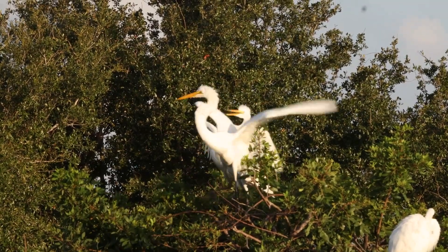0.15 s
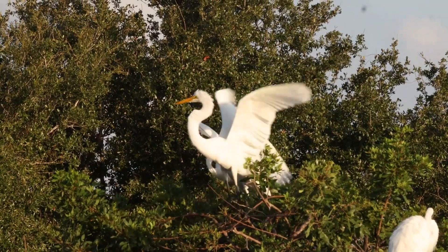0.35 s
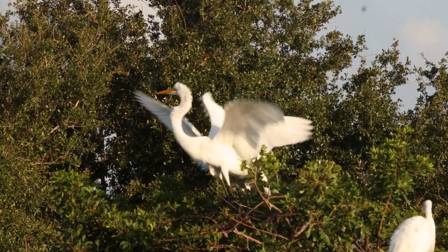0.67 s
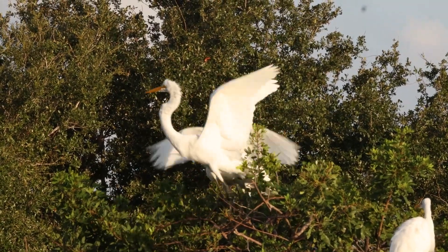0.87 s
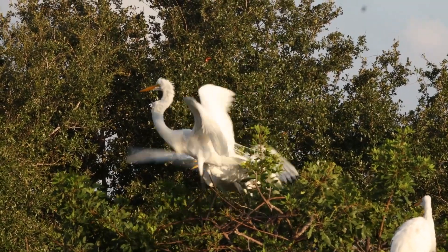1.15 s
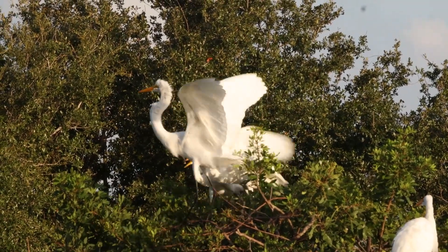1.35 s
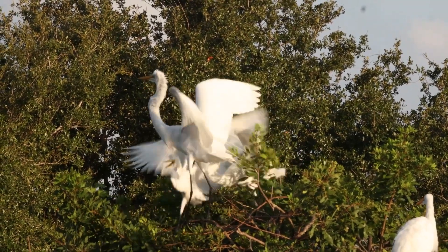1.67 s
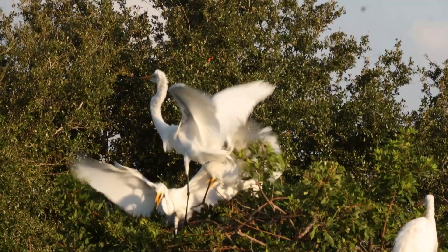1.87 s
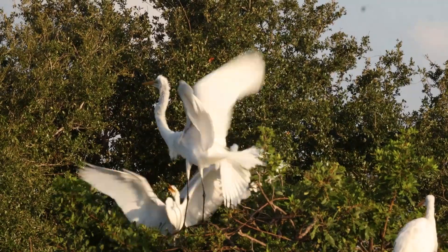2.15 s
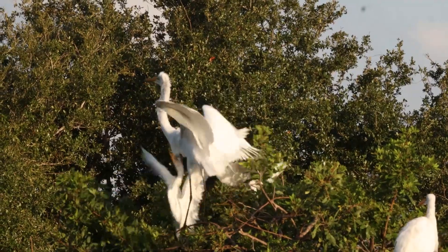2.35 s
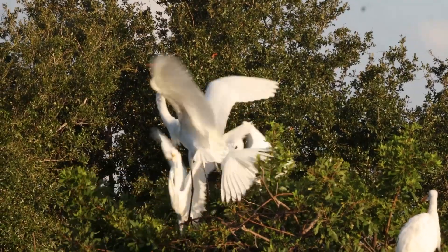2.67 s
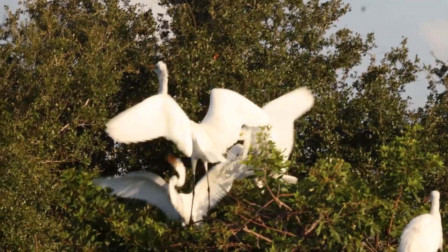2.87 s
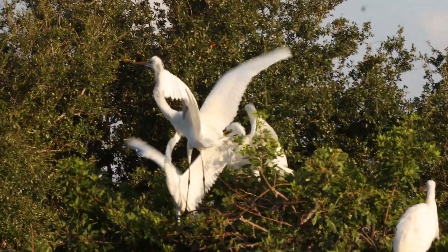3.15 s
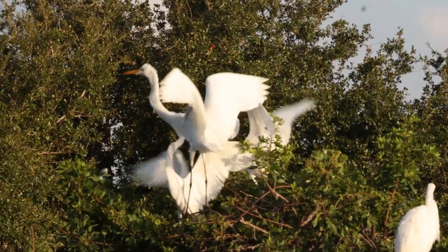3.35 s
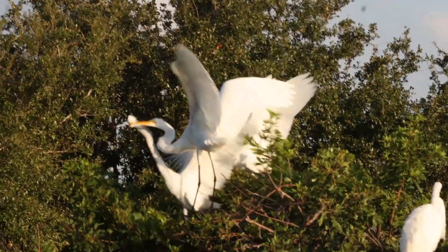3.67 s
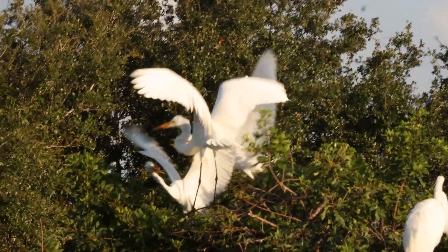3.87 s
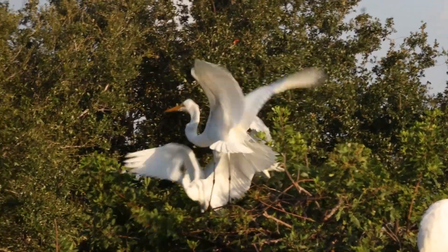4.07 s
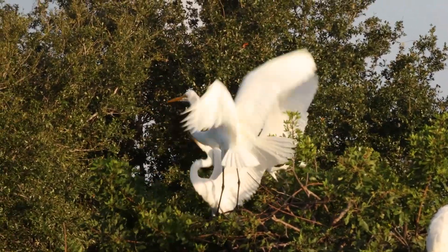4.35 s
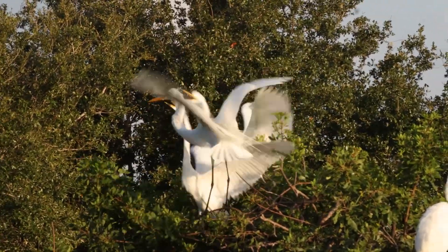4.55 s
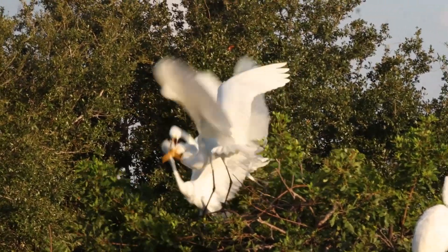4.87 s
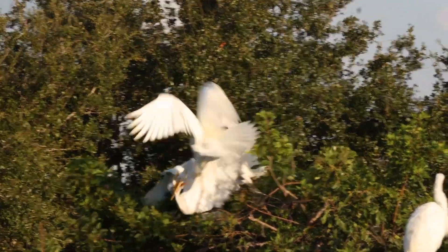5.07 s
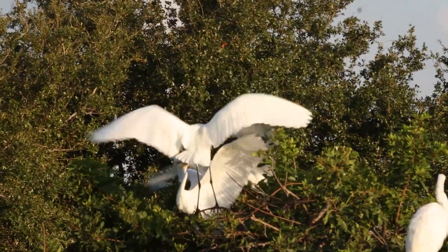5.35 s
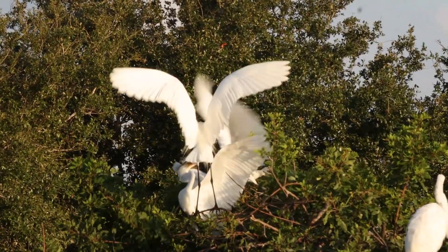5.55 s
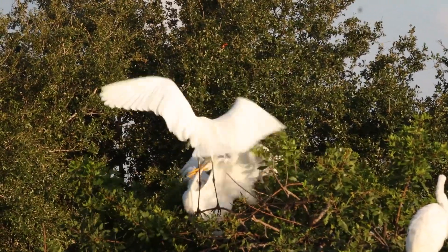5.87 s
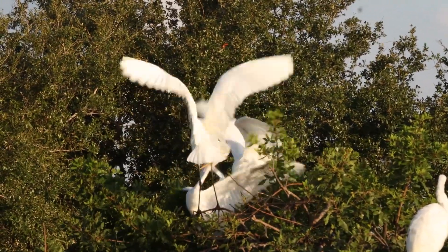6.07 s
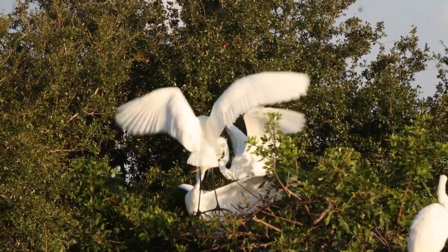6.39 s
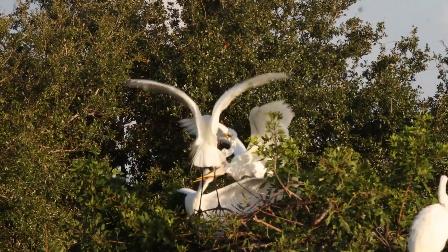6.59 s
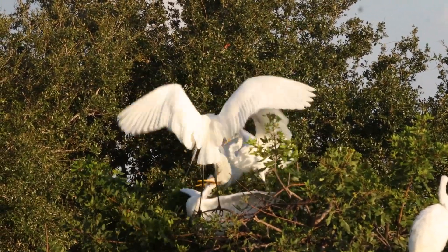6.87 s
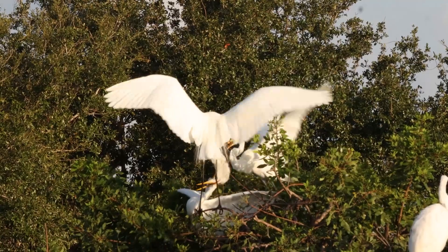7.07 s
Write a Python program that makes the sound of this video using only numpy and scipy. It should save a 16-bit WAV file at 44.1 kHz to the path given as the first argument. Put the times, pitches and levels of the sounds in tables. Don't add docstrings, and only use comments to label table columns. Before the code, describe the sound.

Heron chicks beg in rapid, hoarse, rattling squawks near the microphone, with small-bird whistles, distant nest chatter and a faint road rush behind.

```python
import sys
import numpy as np
from scipy import signal
from scipy.fft import rfft, irfft, next_fast_len
from scipy.io import wavfile
from scipy.ndimage import uniform_filter1d, map_coordinates

SR = 44100
rng = np.random.default_rng(int(sys.argv[2]) if len(sys.argv) > 2 else 0)


def store_pcm(level_fs):
    pcm = np.round(np.clip(level_fs, -1, 1) * 32767).astype(np.int16)
    wavfile.write(sys.argv[1], SR, np.atleast_2d(pcm).T)


def ratio(d):
    e = np.asarray(d, float) / 20
    return 10 ** e


N = 318402


def unit(x):
    return x / np.sqrt(np.mean(x ** 2) + 1e-20)


def along(points, hz):
    f, v = np.transpose(points)
    return np.interp(np.log(hz + 1), np.log(f + 1), v)


def curves(rows):
    s, *cols = np.transpose(rows)
    return [np.interp(np.arange(N) / SR, s, c) for c in cols]


def wobble(rate, size):
    knots = rng.standard_normal(int(size * rate / SR) + 4)
    return map_coordinates(knots, [np.arange(size) * rate / SR])


def phase(hz):
    return 2 * np.pi * np.cumsum(hz) / SR


def filtered(x, response):
    m = next_fast_len(len(x) + 2048)
    return irfft(rfft(x, m) * response(np.fft.rfftfreq(m, 1 / SR)), m)[:len(x)]


def resonance(f, hz, width_hz):
    return 1j * f * width_hz / (hz * hz - f * f + 1j * f * width_hz)


def add(track, s, sound):
    part = track[max(round(s * SR), 0):][:len(sound)]
    part += sound[:len(part)]


# (frequency [Hz], level [dB])
ROAD_COLOUR = [(13, -51), (22, -26.5), (84, -1), (146, 0.5), (291, -7.5), (760, 4), (1550, 0),
               (1780, -12.5), (2410, -22), (3260, -42), (3640, -10), (6130, -39), (7030, -29), (12200, -39),
               (15600, -46)]
# (time [s], level [dB])
ENGINE_LOAD = [
    (0, -60),
    (1, -54.5),
    (1.7, -60),
    (2.9, -54),
    (4.2, -56.5),
    (4.7, -49),
    (5.7, -53),
    (6.3, -50.5),
    (7.22, -50.5),
]
# (multiple of the main order [ratio], level [dB])
ENGINE_ORDERS = [(.5, -15), (1, 0), (1.5, -6.5), (2, -9)]


def road():
    rush = unit(filtered(rng.standard_normal(N), lambda f: ratio(along(ROAD_COLOUR, f))))
    idle_hz, hunt_hz = 163.8, 1.493
    turn = phase(idle_hz + hunt_hz * wobble(3, N))
    load_db = curves(ENGINE_LOAD)[0]
    hum = np.zeros(N)
    for multiple, db in ENGINE_ORDERS:
        level = ratio(db + 2.9 * wobble(2.99, N))
        hum += level * np.sin(multiple * turn + 0.63 * wobble(4.44, N))
    drift = ratio(.4 * wobble(1.5, N))
    return ratio(-40) * drift * rush + ratio(load_db + 0.5) * hum


# (time [s], level [dB])
NEST_LEVEL = [(0, -30.5), (.2, -35), (.62, -37), (1.3, -36.5), (2.4, -35), (3.86, -40.5), (4.42, -37.5),
              (5.67, -42.5), (6.1, -38.5), (6.8, -40), (7.22, -33)]
# (frequency [Hz], level [dB])
NEST_COLOUR = [(1000, -30), (1600, 1), (2400, 6.5), (3300, -1.5), (4500, -10.5), (6200, -11.5), (7500, -26),
               (11000, -36.5), (16000, -47)]


def nests():
    z = signal.stft(rng.standard_normal(N), nperseg=512)[2]
    patches = uniform_filter1d(rng.standard_normal(z.shape), 6, 0)
    patches = uniform_filter1d(patches, 10, 1)
    blur = signal.istft(z * ratio(2.5 * unit(patches)), nperseg=512)[1][:N]
    hoarse = ratio(1.2 * wobble(200, N) + 1.2 * wobble(9, N))
    band = unit(filtered(blur * hoarse, lambda f: ratio(along(NEST_COLOUR, f))))
    return ratio(curves(NEST_LEVEL)[0] - 5.5) * band


# (frequency [Hz], time to fall 60 dB [s])
TREE_DECAY = [(500, 0.057), (2500, 0.18), (9000, 0.18)]


def trees(x):
    hz, t, z = signal.stft(rng.standard_normal(SR // 2), SR, nperseg=256)
    decay = ratio(-60 * t / along(TREE_DECAY, hz)[:, None])
    tail = signal.istft(z * decay, SR, nperseg=256)[1]
    late = np.pad(x, (200, 0))
    return signal.fftconvolve(late, tail / np.linalg.norm(tail))[:N]


# (time [s], length [s], start [Hz], end [Hz], level [dB])
WHISTLES = [(0, .05, 3130, 3120, -33.2), (0, .02, 2400, 2300, -44.7), (.05, .03, 2250, 2250, -40.7),
            (.05, .018, 5500, 5600, -42.9), (.1, .11, 3100, 2380, -36.2), (.13, .2, 6750, 7000, -63.7),
            (.57, .07, 1900, 1900, -43.9), (1.045, .04, 3050, 3230, -39.5), (1.08, .07, 3230, 2780, -36.5),
            (1.79, .09, 2450, 2450, -40.6), (2.06, .05, 3100, 2800, -34.3), (2.2, .05, 3300, 2800, -35.7),
            (2.235, .1, 2500, 1950, -38.8), (2.555, .035, 2900, 2400, -43), (2.88, .13, 6800, 6850, -60.4),
            (3.8, .1, 2300, 2350, -43.3), (4.11, .11, 3000, 2200, -46), (5.305, .025, 3100, 2500, -44),
            (5.34, .025, 3000, 2400, -45.1), (5.52, .04, 2900, 2300, -40.4), (6.36, .07, 2900, 2100, -43.7),
            (5.9, .12, 3400, 2800, -45), (6.9, .11, 3500, 2900, -47), (7.05, .11, 3300, 2800, -50)]
# (time [s], length [s], start [Hz], end [Hz], level [dB])
TRILLS = [
    (.07, .47, 5750, 5750, -51.2),
    (.07, .35, 3150, 3150, -51.4),
    (2.73, .06, 3100, 2900, -43.8),
    (3.63, .08, 3400, 3000, -39.1),
    (4.88, .18, 3620, 3600, -50.2),
    (5.36, .065, 2850, 2700, -42.4),
]


def songbirds():
    x = np.zeros(N)
    trill_per_s = 58
    songs = [(*w, 0) for w in WHISTLES] + [(*w, trill_per_s) for w in TRILLS]
    for s, length, from_hz, to_hz, db, rate in songs:
        u = np.linspace(0, 1, round(length * SR))
        glide_hz = from_hz + (to_hz - from_hz) * np.sin(np.pi * u / 2) ** 2
        shake_hz = .012 * from_hz + min(700 * length, 70)
        hz = glide_hz + shake_hz * wobble(500, len(u))
        chop = (.5 + .5 * np.cos(2 * np.pi * rate * length * u)) ** 3
        swell = np.sin(np.pi * u) ** .2 * ratio(1.5 * wobble(250, len(u)))
        add(x, s, ratio(db + 2.5) * unit(swell * chop) * np.sin(phase(hz)))
    return x


# (time [s], peak level [dB])
CLACKS = [
    (2.7594, -58),
    (5.0564, -46),
    (5.1971, -38),
    (5.7853, -29),
]


def clacks():
    x, t = np.zeros(N), np.arange(800) / SR
    for s, db in CLACKS:
        decay = ratio(db - 6.5 - 60 * t / .012)
        add(x, s, decay * rng.standard_normal(len(t)))
    return filtered(x, lambda f: resonance(f, 2800, 8000))


# (centre [Hz], width [Hz], level [dB])
WINDPIPE = [(2120, 600, -8.5), (2780, 880, -18.5), (4630, 1900, -13)]
# (frequency [Hz], level [dB])
BILL = [(2500, -128), (4500, 1), (6000, 5.5), (8000, -4.5), (11000, -13.5), (14000, -21.5), (16000, -27)]


def squawk(length, peak, db, pitch_hz, rattle_hz, chest_db, throat_hz, mouth_hz, mouth_db, bright_db, depth):
    size = SR // 5
    u = np.arange(size) / SR / length
    peak = np.clip(peak, .1, .85)
    rise_db = 6.68 * (1 - u / peak) ** 2
    fall_db = 13.84 * np.abs((u - peak) / (1.05 - peak)) ** 2.13
    onset = np.clip(u * length / .004, 0, 1)
    effort = ratio(-np.where(u < peak, rise_db, fall_db)) * onset

    slow = phase(rattle_hz * (1 + .025 * wobble(60, size)))
    gate = 1 + np.clip(.38 + 1.3 * depth, 0, .95) * np.cos(slow + .6 * np.sin(slow))
    bend = .07 * (effort - .85) + .02 * wobble(30, size) + .015 * wobble(300, size)
    turn = phase(pitch_hz * (1 + bend))
    orders = np.arange(2, 31)[:, None]
    uneven = ratio(2.8 * wobble(45, orders.size * size).reshape(-1, size))
    start = 1.5 * rng.standard_normal(orders.shape)
    pulses = (uneven * np.cos(orders * turn + start)).sum(axis=0)
    pulses = unit(pulses) * ratio(1.5 * wobble(500, size))
    breath = rng.standard_normal(size) * (1 + .8 * np.cos(turn))
    source = gate * (pulses + .6 * breath)

    def windpipe(f):
        return sum((-1) ** k * ratio(g) * resonance(f, c, w) for k, (c, w, g) in enumerate(WINDPIPE))

    def tract(gape):
        def response(f):
            low_chest = ratio(chest_db) * resonance(f, 1090, 270)
            chest = ratio(chest_db + 5.5) * resonance(f, 1568, 275) ** 2
            throat = resonance(f, gape ** .9 * throat_hz, 420) ** 2
            mouth = ratio(mouth_db - 1.5) * resonance(f, gape * mouth_hz, 610)
            cut = resonance(f, 2800, 3400) ** 2
            return cut * (throat - mouth - chest + windpipe(f) + low_chest)
        return filtered(source, response)

    opening = 4 * np.sin(np.pi * np.clip(u, 0, 1) ** .7) ** .6
    body = sum(np.clip(1 - abs(opening - k), 0, 1) * tract(.64 + .1 * k) for k in range(5))
    hollows = throat_hz * (np.arange(2, 6) + .3 * rng.standard_normal(4))

    def edge(f):
        return ratio(along(BILL, f)) * (1 + sum(resonance(f, c, 250) for c in hollows))

    top = filtered(np.sqrt(gate) * source, edge)
    top = top * ratio(2 * wobble(90, size))
    bright = effort ** 1.95 * ratio(bright_db + 8.5) * unit(top)
    return ratio(db - 2.5) * (effort * unit(body) + bright)


# (time [s], length [s], peak position [share of length], level [dB], bill brightness [dB])
DEEP = [(.202, 0.089, 0.49, -28.5, -24), (.807, 0.048, 0.38, -26, -17.5), (1.64, 0.064, 0.15, -30, -17.5),
        (1.786, .051, 0.14, -33, -19), (2.177, 0.057, .18, -27, -12), (2.455, 0.069, 0.4, -34, -18),
        (3.685, 0.062, 0.34, -31.5, -18.5), (4.467, 0.063, 0.32, -28, -19),
        (6.244, 0.055, 0.23, -34, -14.5), (6.882, 0.087, 0.22, -37, -17.5),
        (6.999, 0.064, 0.17, -39, -10.5), (7.158, 0.0596, 0.49, -33, -10.5)]
HOARSE = [(.969, 0.048, 0.31, -22, -20), (1.233, 0.062, 0.42, -28.5, -20.5), (1.38, 0.054, 0.3, -23, -20),
          (3.253, 0.041, .36, -29, -21), (3.896, .055, .41, -30.5, -25.5), (4.045, .04, 0.38, -25.5, -18.5),
          (4.624, 0.063, 0.27, -23, -24), (6.3, 0.059, 0.15, -33, -26), (6.516, 0.05, 0.55, -26.5, -19),
          (6.676, 0.077, 0.15, -25.5, -16.5)]
SHRILL = [(.841, 0.05, 0.3, -24.5, -20.5), (1.115, 0.074, 0.43, -24.5, -19),
          (1.271, 0.028, 0.58, -26.5, -14.5), (1.725, 0.055, 0.29, -24.5, -19.5),
          (2.367, 0.044, .53, -17, -15.5), (4.007, 0.048, 0.25, -23, -17.5),
          (4.427, 0.0456, .37, -20, -24.5), (6.041, 0.029, 0.7, -24, -22.5),
          (6.074, 0.041, 0.21, -24, -25.5)]
GAPING = [(.42, 0.07, 0.43, -25, -14.5), (1.303, 0.038, 0.26, -24.5, -19.5), (1.561, .078, 0.5, -25, -18),
          (1.959, 0.093, 0.45, -22, -16), (2.035, 0.07, 0.35, -30.5, -17), (2.096, 0.047, 0.55, -20, -17),
          (2.135, .044, 0.21, -27, -14), (2.252, 0.029, .17, -43, -14), (2.398, 0.0465, 0.32, -18.5, -19),
          (5.642, 0.074, 0.3, -28.5, -23.5)]
WIDE = [
    (.637, .086, 0.47, -25, -19.5),
    (5.056, .089, 0.6, -31.5, -21),
    (5.228, 0.061, 0.56, -27.5, -17),
    (5.478, 0.068, 0.53, -35.5, -24),
    (5.87, 0.082, .4, -31.5, -24),
]
PLAIN = [
    (2.601, 0.13, 0.37, -24.5, -22.5),
    (3.005, 0.081, 0.57, -21.5, -17.5),
    (3.217, 0.04, 0.25, -28.5, -36),
    (4.222, 0.096, 0.55, -22, -17.5),
    (4.397, 0.0286, 0.57, -24, -10.5),
    (6.475, 0.043, 0.28, -32.5, -26),
]
MUFFLED = [(2.295, 0.018, 0.63, -47, -26), (2.786, 0.092, 0.19, -23, -15),
           (3.175, 0.057, 0.47, -26.5, -17.5), (3.396, 0.046, 0.49, -28.5, -21.5),
           (3.435, 0.075, 0.29, -25.5, -30), (3.588, 0.083, 0.42, -24.5, -26),
           (3.855, 0.0224, 0.26, -42, -18), (4.674, 0.072, 0.18, -27, -31), (4.834, 0.055, .33, -30, -27)]
# (squawk table, voice: pitch, rattle, throat, mouth [Hz]; chest, mouth [dB]; rattle depth [ratio])
CHICKS = [
    (DEEP, dict(pitch_hz=482.4, rattle_hz=208.7, chest_db=2.5, throat_hz=2325, mouth_hz=3750, mouth_db=-5.5, depth=0.028)),
    (HOARSE, dict(pitch_hz=475.3, rattle_hz=189.3, chest_db=-4, throat_hz=2207, mouth_hz=4070, mouth_db=-4.5, depth=0.085)),
    (SHRILL, dict(pitch_hz=500, rattle_hz=269.2, chest_db=-12, throat_hz=2607, mouth_hz=3830, mouth_db=-0.5, depth=0.021)),
    (GAPING, dict(pitch_hz=514, rattle_hz=271.1, chest_db=-18, throat_hz=2220, mouth_hz=3690, mouth_db=0.5, depth=0.033)),
    (WIDE, dict(pitch_hz=514, rattle_hz=232.2, chest_db=-9.5, throat_hz=2205, mouth_hz=3720, mouth_db=-1.5, depth=0.02)),
    (PLAIN, dict(pitch_hz=489.5, rattle_hz=217.4, chest_db=-11, throat_hz=2244, mouth_hz=3480, mouth_db=-5.5, depth=0.021)),
    (MUFFLED, dict(pitch_hz=471.5, rattle_hz=182.5, chest_db=-26, throat_hz=2275, mouth_hz=3000, mouth_db=-8.5, depth=0.04)),
]


def chicks():
    x = np.zeros(N)
    usual_s, usual_bill_db = .06, -20
    for calls, voice in CHICKS:
        for s, length, peak, db, bright_db in calls:
            rattle_hz = voice["rattle_hz"] * (usual_s / length) ** 0.348
            mouth_db = voice["mouth_db"] + .3 * (bright_db - usual_bill_db)
            pose = dict(voice, rattle_hz=rattle_hz, mouth_db=mouth_db)
            add(x, s, squawk(length, peak, db, bright_db=bright_db, **pose))
    return x


def scene():
    near, small = chicks() + clacks(), songbirds()
    scatter = trees(ratio(-9) * near + ratio(-6) * small)
    return (near + small + scatter + nests() + road())[None]


def low_pass(x):
    return signal.sosfilt(signal.butter(12, 15180, fs=SR, output="sos"), x)


def record(dry):
    return low_pass(dry)


dry = scene()
out = record(dry)
store_pcm(out)
```